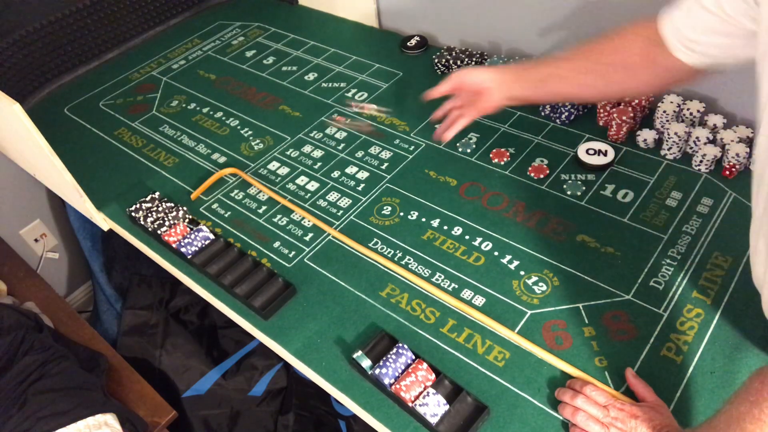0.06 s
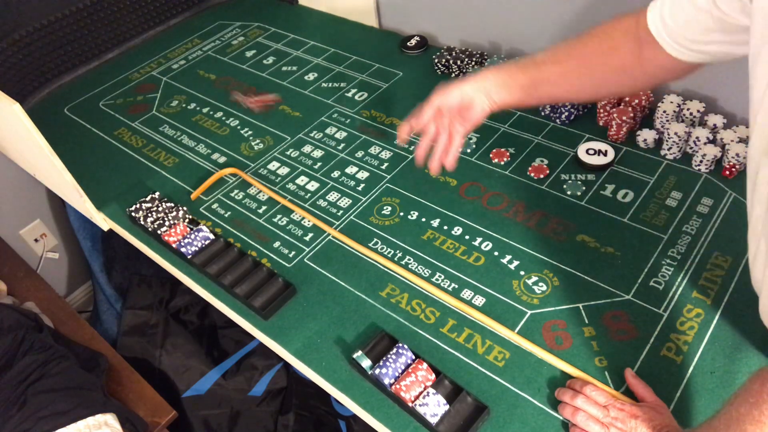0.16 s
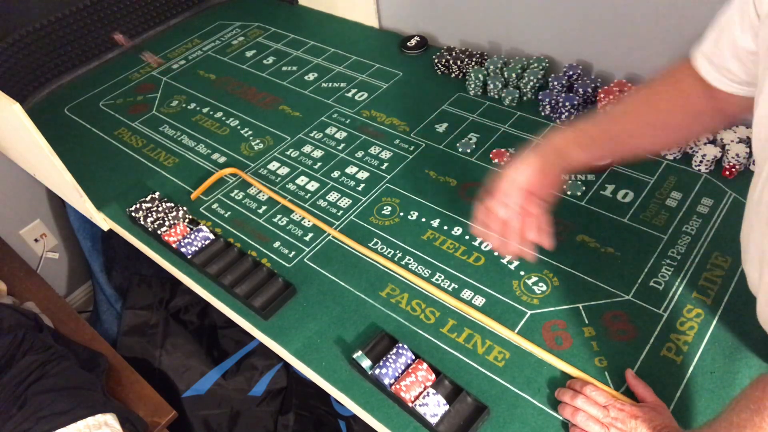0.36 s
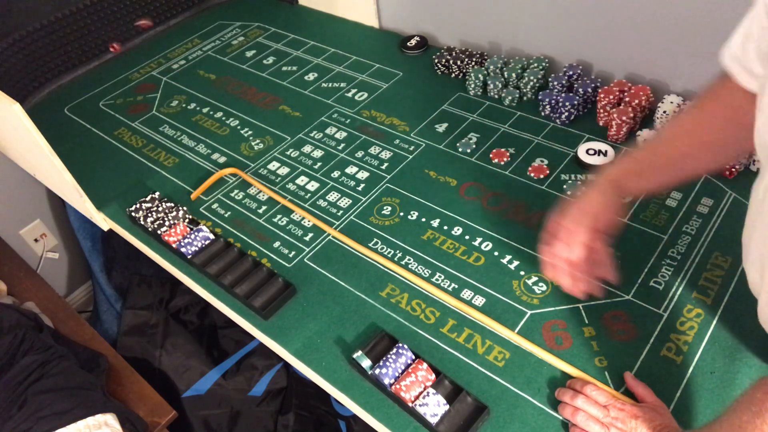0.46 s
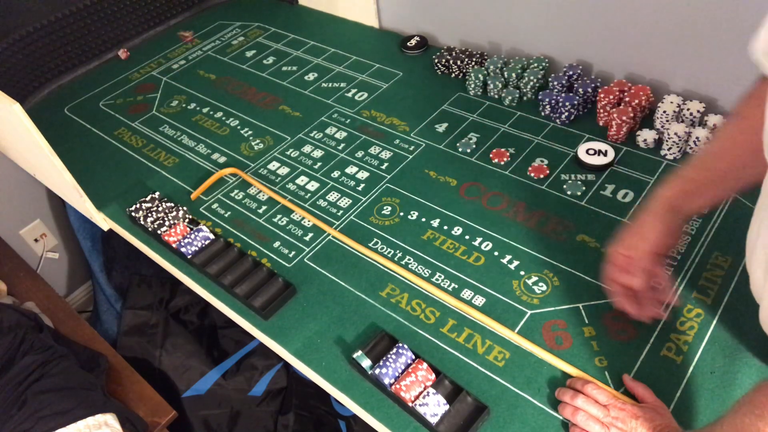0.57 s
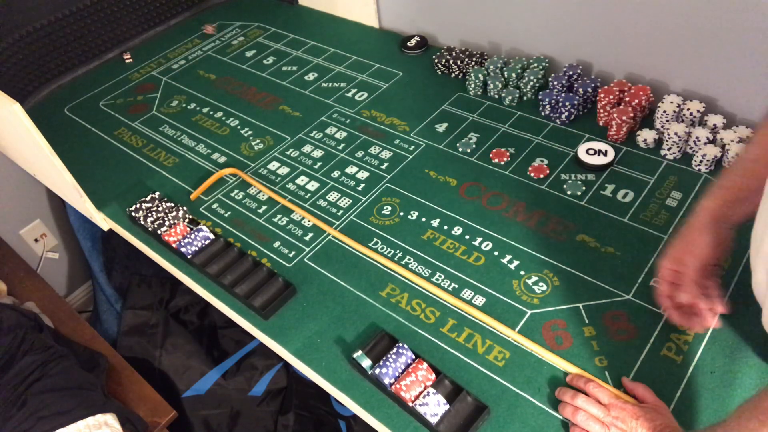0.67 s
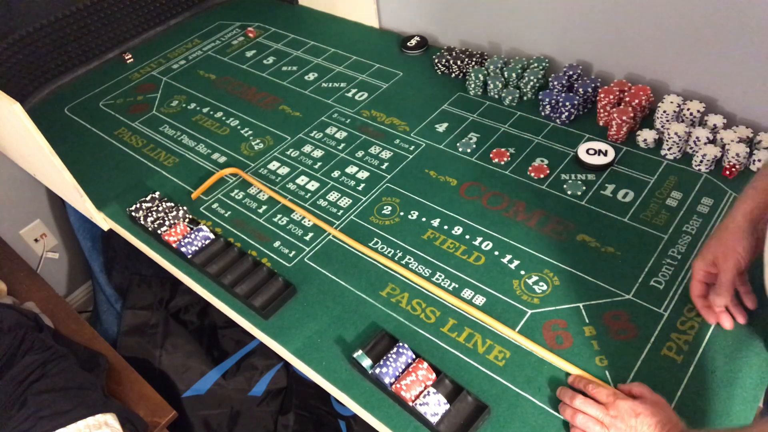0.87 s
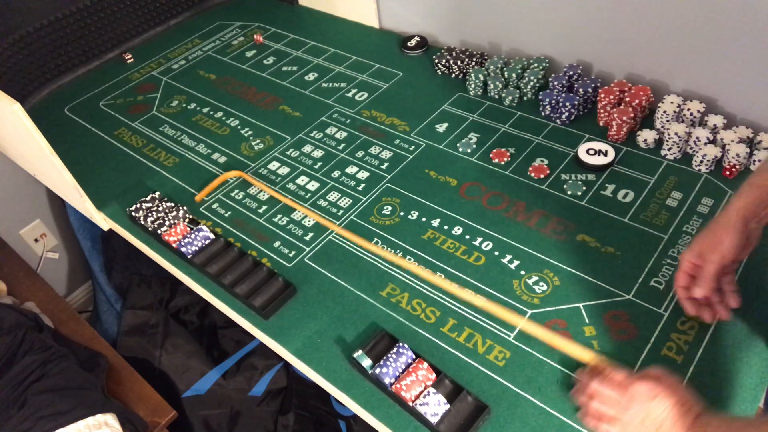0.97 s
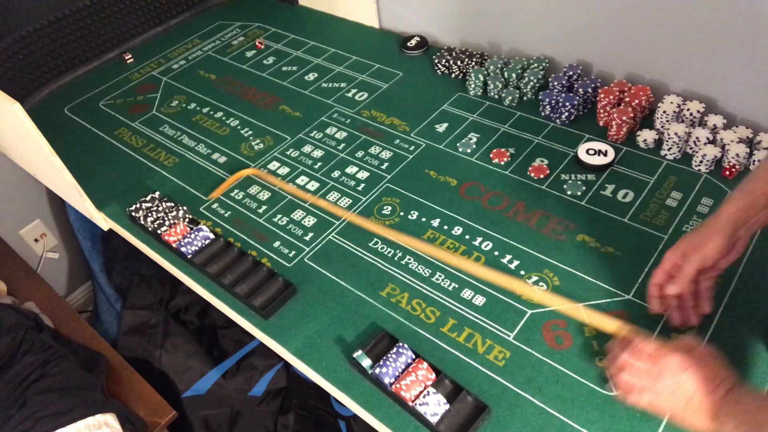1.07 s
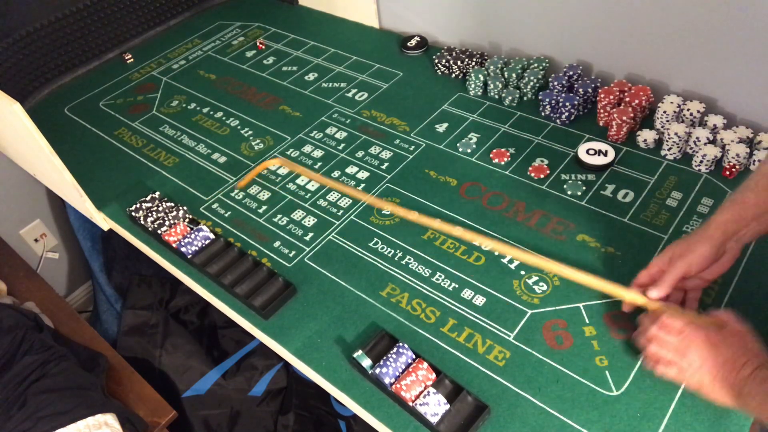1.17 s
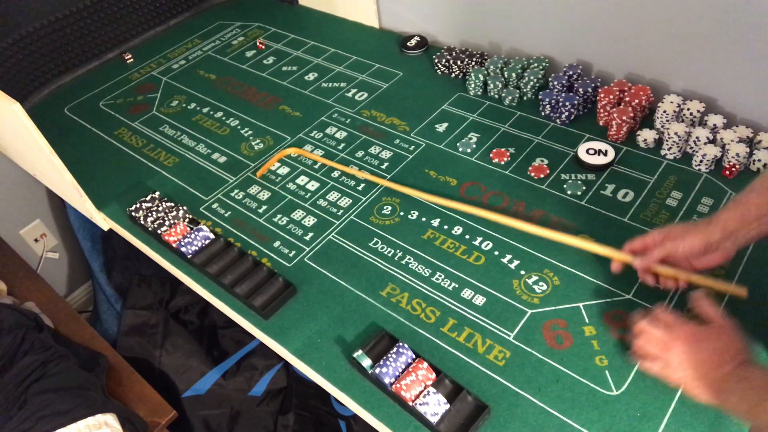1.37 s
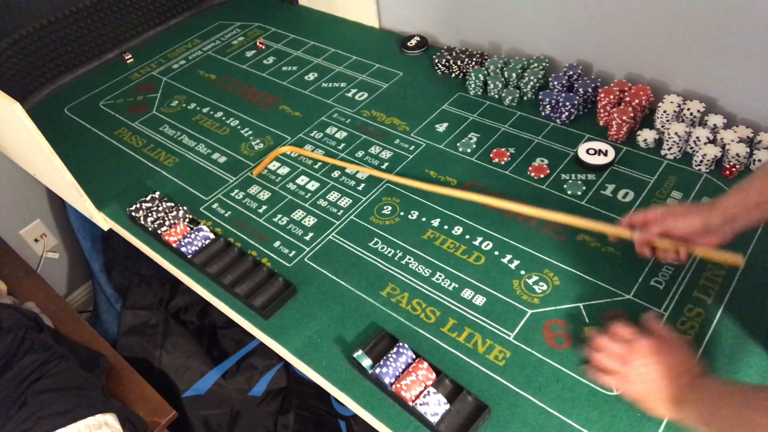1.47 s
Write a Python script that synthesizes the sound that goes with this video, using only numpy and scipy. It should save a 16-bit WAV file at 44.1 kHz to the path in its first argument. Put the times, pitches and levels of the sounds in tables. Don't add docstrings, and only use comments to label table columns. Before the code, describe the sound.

Two plastic dice strike a felt-covered wooden table in a quick run of loud, sharp knocks, click against each other, then tumble with softening thuds; faint brushing on felt follows. Small live room, close microphone.

```python
import sys
import numpy as np
from scipy import signal
from scipy.fft import rfft, irfft, next_fast_len
from scipy.io import wavfile
from scipy.ndimage import uniform_filter1d, map_coordinates

SR = 44100
rng = np.random.default_rng(int(sys.argv[2]) if len(sys.argv) > 2 else 0)


def gain_from_decibels(decibels):
    exponent = np.asarray(decibels, float) / 20
    return 10 ** exponent


def to_wav(s):
    ch = np.atleast_2d(s).T
    pcm = np.round(np.clip(ch, -1, 1) * 32767)
    wavfile.write(sys.argv[1], SR, pcm.astype(np.int16))


N = 66150

# frequency in Hz, level in dB per Hz.
HUSH_COLOUR = [(26, -30), (55, -4), (110, -4), (250, -3.5), (450, -7), (900, -11), (1200, -9.5),
               (1600, -13), (15500, -28.5)]
# time in seconds, gain in dB.
GAIN_DUCK = [(.2, 0), (.3, -3.5), (.92, -3.5), (.97, -1), (1.3, -1)]
# frequency in Hz, t60 in seconds.
ROOM_DECAY = [(60, 0.28), (300, 0.78), (1000, 0.63), (3000, .45), (7000, 0.58), (14000, 0.37)]
# frequency in Hz, level in dB.
ROOM_COLOUR = [(60, 31), (300, 3), (700, 0), (1500, -4), (6000, -3), (12000, -9.5)]
# start in seconds, knock level
# in dB, its loudest tone in Hz, hardest tone reached in Hz, tick level in dB.
KNOCKS = [(.203, -56, 870, 2105, -90), (0.2118, -15.5, 2550, 2870, -36), (.2135, -21, 926, 2900, -76),
          (0.2609, -21.5, 2200, 2900, -35.5), (.262, -19, 1050, 2700, -81), (.345, -17.5, 2620, 3640, -46),
          (.346, -13, 1434, 3060, -92), (.4215, -27.5, 3850, 4300, -56), (.4235, -14, 1580, 2050, -90),
          (0.455, -16, 2400, 3300, -47), (.457, -23.5, 740, 2960, -90), (.545, -32, 1060, 1390, -90),
          (.649, -31, 830, 2300, -53), (.705, -38.5, 550, 1500, -81.5), (.797, -55.5, 567, 1475, -59.5),
          (.8925, -47.5, 860, 1630, -91), (0.894, -55, 2700, 3140, -112.5), (.985, -68.5, 648, 1300, -81.5),
          (1.089, -53, 778, 1600, -58), (1.09, -51, 2700, 3400, -90), (.424, -25, 510, 910, -87)]
# frequency in Hz, level in dB.
BOARD_COLOUR = [(300, 11.5), (600, 3), (1130, 3.5), (1450, 1), (1900, -1.5), (2400, 0), (4000, -7)]
# frequency in Hz, width in Hz, level in dB.
DIE_ON_FELT = [(2900, 350, 10), (4300, 350, 7.5), (5800, 600, 0), (7120, 4400, -4.5), (8800, 4500, -6.5),
               (13000, 4000, -37)]
# frequency in Hz, width in Hz, level in dB.
DIE_ON_DIE = [(2930, 870, 10.5), (4300, 1600, -23), (5650, 600, -4), (7700, 2000, -6), (11250, 1200, -17.5),
              (14500, 1800, -37)]
# start in seconds, thud level in dB,
# loudest table tone in Hz, boom level in dB.
THUDS = [(.213, -20.5, 314, -31), (.263, -22.5, 300, -21.5), (.346, -19.5, 346, -31),
         (.423, -22.5, 248, -46), (.457, -22.5, 330, -55), (.545, -29, 307, -47), (0.65, -29, 189.4, -44),
         (0.801, -34.5, 243, -34.5), (.832, -41.5, 185.2, -89), (0.892, -34, 304.4, -39),
         (0.921, -36, 366, -73), (0.989, -39, 309, -36.5), (1.029, -57, 248, -75), (1.093, -37, 319.3, -38),
         (1.199, -55.5, 198.6, -44), (1.301, -72, 141.4, -42.5), (1.409, -80, 132, -49)]
# frequency in Hz, level in dB, t60 in seconds.
TABLE_MODES = [(111.3, -15, 0.45), (166, 0, 0.098), (229.8, 2, 0.082), (301.8, 3.5, 0.1), (330, 1.5, .1),
               (378.2, -1.5, 0.16), (420.6, 5.5, 0.073), (499.5, 2, 0.066), (578.7, -6, 0.24)]
# frequency in Hz, level in dB, rise in seconds, t60 in seconds.
FRAME_MODES = [(68, 2, 0.011, 0.17), (151, -5.5, 0.0053, 0.05)]
# start in seconds, rise in seconds, hold in seconds,
# release t60 in seconds, level in dB.
BRUSHES = [
    (0.931, .008, 0.022, 0.23, -72),
    (0.995, 0.04, 0.18, 0.58, -78.5),
    (1.225, 0.0078, 0.11, 0.39, -68.5),
    (1.38, 0.064, .1, 0.62, -75.5),
]
# frequency in Hz, level in dB per Hz.
CLOTH_COLOUR = [(600, -49), (1300, -13), (2200, 1.5), (4500, -4), (5600, -7), (6600, -2), (8500, -8),
                (16000, -20)]

HUSH_DB = -67.5
ROOM_DB, SOFT_ROOM_DB, THUD_ROOM_DB = -1, -7, -12
ROOM_DELAY_S, ROOM_RISE_S = 0.006, 0.0035
SOFT_AFTER_S = 0.6
KNOCK_RISE_S, KNOCK_T60_S, KNOCK_OCTAVES, EDGE_STEEP = 0.0025, 0.037, 0.82, 15
TICK_T60_S, NO_TICK_DB = 0.019, -80
CLACK_S, CLACK_DB = 0.4555, -29
THUD_RISE_S, TONE_OCTAVES, MODE_SCATTER_DB = 0.0028, 0.82, 2.5
SPOT_DB, SPOT_S, SPOT_RISE_PER_S = -0.5, 0.035, 6.9
LEAD = 256
LOW_CUT_HZ, TOP_HZ = 55, 16300


def unit(x):
    return x / np.sqrt(np.mean(x ** 2) + 1e-20)


def along(points, hz):
    f, value = np.transpose(points)
    return np.interp(np.log(hz + 1), np.log(f + 1), value)


def filtered(x, response):
    m = next_fast_len(len(x) + 8192)
    hz = np.fft.rfftfreq(m, 1 / SR)
    return irfft(rfft(x, m) * response(hz), m)[:len(x)]


def shape(t, rise, t60):
    return (1 - np.exp(-t / rise)) * gain_from_decibels(-60 * t / t60)


def hush():
    duck_db = np.interp(np.arange(N) / SR, *np.transpose(GAIN_DUCK))
    hiss = filtered(rng.standard_normal(N), lambda f: gain_from_decibels(along(HUSH_COLOUR, f)))
    return gain_from_decibels(HUSH_DB + duck_db) * unit(hiss)


def burst(envelope):
    z = rfft(rng.standard_normal(len(envelope)) * envelope)
    even = irfft(z / uniform_filter1d(abs(z), size=60), len(envelope))
    even = even[:len(envelope) // 2]
    return even * np.linalg.norm(envelope) / np.linalg.norm(even)


def knock(tone_hz, edge_hz):
    def response(f):
        near_db = -6 * (np.log2((f + 1) / tone_hz) / KNOCK_OCTAVES) ** 2
        edge = 1 / np.sqrt(1 + (f / edge_hz) ** (2 * EDGE_STEEP))
        return np.sqrt(SR / 2 / tone_hz) * gain_from_decibels(along(BOARD_COLOUR, f) + near_db) * edge
    return response


def tick(body):
    def response(f):
        total = 0
        for k, (centre, width, db) in enumerate(body):
            resonance = 1j * f * width / (centre * centre - f * f + 1j * f * width)
            total = total + (-1) ** k * gain_from_decibels(db) * resonance
        return 2 * total
    return response


def thud(t, tone_hz, soft):
    hz, db, t60 = np.transpose(TABLE_MODES)[..., None]
    luck = rng.standard_normal((2, len(TABLE_MODES), 1))
    near_db = -6 * (np.log2(hz / tone_hz) / TONE_OCTAVES) ** 2
    level = gain_from_decibels(db + near_db + MODE_SCATTER_DB * luck[0])
    rings = level * np.sin(2 * np.pi * hz * t + 0.32 * luck[1])
    modes = np.sum(rings * shape(t, THUD_RISE_S, t60), axis=0)
    spot = np.sin(2 * np.pi * tone_hz * t * (1 + 0.5 * SPOT_RISE_PER_S * t))
    spot = spot * np.sin(np.pi * np.clip(t / SPOT_S, 0, 1) ** 0.54) ** 2
    return 0.5 * (modes + soft * gain_from_decibels(SPOT_DB) * spot)


def boom(t):
    return sum(gain_from_decibels(db) * np.sin(2 * np.pi * hz * t) * shape(t, rise, t60)
               for hz, db, rise, t60 in FRAME_MODES)


def room(x):
    hz, t, z = signal.stft(rng.standard_normal(SR), SR, nperseg=256)
    decay = gain_from_decibels(-60 * t / along(ROOM_DECAY, hz)[:, None])
    tail = signal.istft(z * decay, SR, nperseg=256)[1]
    tail = tail * (1 - np.exp(-np.arange(len(tail)) / SR / ROOM_RISE_S))
    tail = filtered(tail / np.linalg.norm(tail), lambda f: gain_from_decibels(along(ROOM_COLOUR, f)))
    return signal.fftconvolve(x, np.pad(tail, (round(ROOM_DELAY_S * SR), 0)))


def add(out, s, force, colour, room_db):
    wet = gain_from_decibels(room_db) * room(force)
    wet[:len(force)] += force
    out[round(s * SR) - LEAD:][:len(wet) + LEAD] += filtered(np.pad(wet, (LEAD, 0)), colour)


def dice():
    out = np.zeros(N + 2 * SR)
    t = np.arange(SR // 2) / SR
    tick_shape = gain_from_decibels(-60 * t / TICK_T60_S)
    for s, knock_db, tone_hz, edge_hz, tick_db in KNOCKS:
        room_db = ROOM_DB if s < SOFT_AFTER_S else SOFT_ROOM_DB
        force = burst(shape(t, KNOCK_RISE_S, KNOCK_T60_S))
        add(out, s, gain_from_decibels(knock_db) * force, knock(tone_hz, edge_hz), room_db)
        if tick_db > NO_TICK_DB:
            add(out, s, gain_from_decibels(tick_db) * burst(tick_shape), tick(DIE_ON_FELT), room_db)
    for s, thud_db, tone_hz, boom_db in THUDS:
        table = gain_from_decibels(thud_db) * thud(t, tone_hz, s > SOFT_AFTER_S)
        add(out, s, table, np.ones_like, THUD_ROOM_DB)
        out[round(s * SR):][:len(t)] += gain_from_decibels(boom_db) * boom(t)
    add(out, CLACK_S, gain_from_decibels(CLACK_DB) * burst(tick_shape), tick(DIE_ON_DIE), ROOM_DB)
    return out[:N]


def brush():
    t = np.arange(N) / SR
    grain_db = map_coordinates(rng.standard_normal(400), [t * 150])
    friction = rng.standard_normal(N) * gain_from_decibels(grain_db)
    hiss = unit(filtered(friction, lambda f: gain_from_decibels(along(CLOTH_COLOUR, f))))
    stroke = np.zeros(N)
    for s, rise, hold, t60, db in BRUSHES:
        release_db = -60 * np.clip(t - s - rise - hold, 0, None) / t60
        stroke += gain_from_decibels(db + release_db) * np.clip((t - s) / rise, 0, 1)
    return hiss * stroke


def scene():
    return (hush() + dice() + brush())[None]


def band_limit(x):
    return signal.sosfilt(signal.butter(12, 16580, fs=SR, output="sos"), x)


def record(dry):
    def mic(f):
        roll_off = (1j * f / (LOW_CUT_HZ + 1j * f)) ** 2
        lower_roll_off = (1j * f / (0.5 * LOW_CUT_HZ + 1j * f)) ** 2
        return roll_off * lower_roll_off * (f < TOP_HZ)
    return band_limit(filtered(dry[0], mic)[None])


dry = scene()
out = record(dry)
to_wav(out)
```